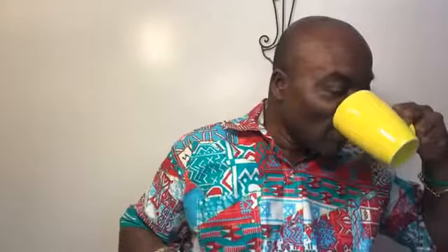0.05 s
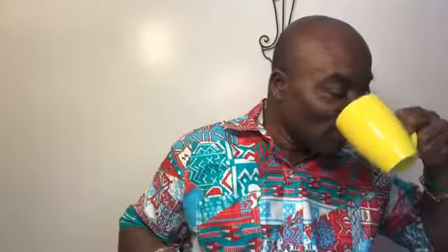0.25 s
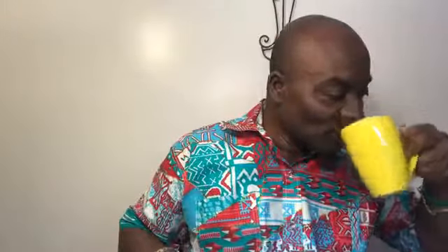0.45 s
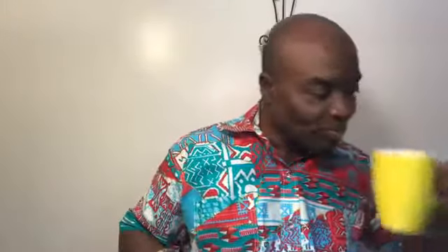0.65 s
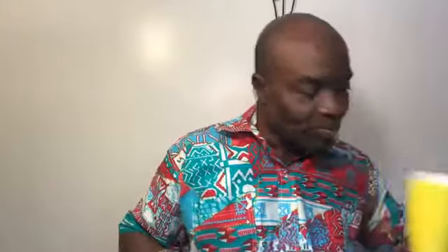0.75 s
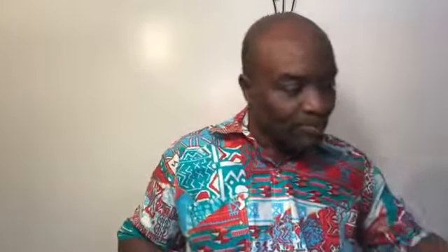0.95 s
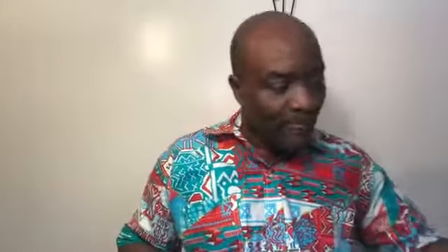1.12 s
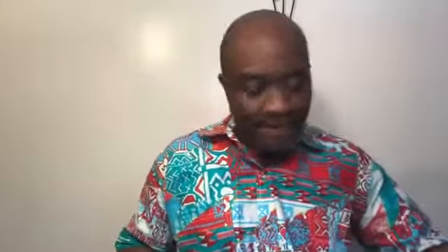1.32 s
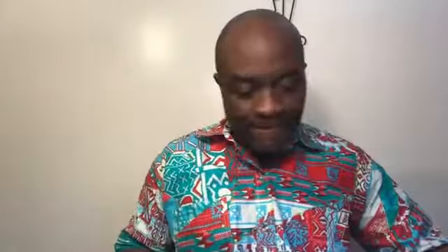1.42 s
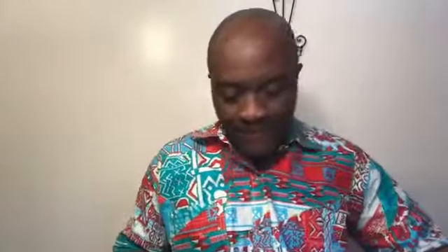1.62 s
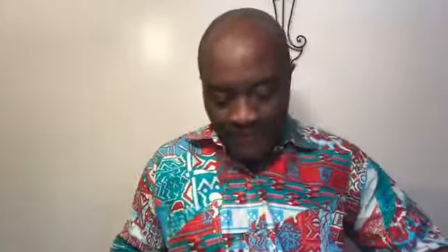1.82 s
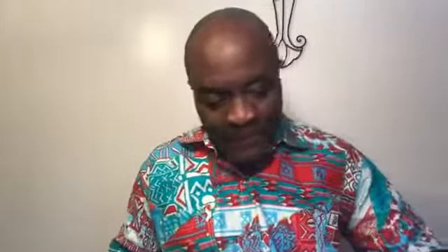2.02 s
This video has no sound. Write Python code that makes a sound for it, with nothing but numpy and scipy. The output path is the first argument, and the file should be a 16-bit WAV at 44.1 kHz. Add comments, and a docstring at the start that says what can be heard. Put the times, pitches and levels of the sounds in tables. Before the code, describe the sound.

A mug is set down on a wooden table in a small quiet room. At first there is only a faint hum and hiss, with a few very soft thuds and ticks around 0.5 and 1 second. The mug knocks on the table at about 1.5 seconds, then lands harder and brighter at about 1.9 seconds, rocking once. Each knock rings briefly and dies away.

```python
"""Small quiet room, wooden table: a mug is set down with one knock, then a harder one that rocks once more.
Each contact cracks, rings the table top and the mug, and dies away in the room.
Underneath: a few very faint thuds and ticks, mains hum, low rumble with hiss."""
import sys
import numpy as np
from scipy import signal
from scipy.fft import rfft, irfft
from scipy.io import wavfile
from scipy.ndimage import uniform_filter1d

SR = 44100
rng = np.random.default_rng(int(sys.argv[2]) if len(sys.argv) > 2 else 0)


def output_pcm(signal):
    """Save a mono or channel-first signal as 16-bit PCM at the path in sys.argv[1].

    Samples are clipped to [-1, 1] before scaling.
    """
    pcm = np.clip(np.atleast_2d(signal).T, -1, 1) * 32767
    wavfile.write(sys.argv[1], SR, np.round(pcm).astype(np.int16))


N = 91331
TIME_S = np.arange(N) / SR
FREQ_HZ = np.fft.rfftfreq(N, 1 / SR) + 1e-3

# mug foot on table: faint grazes, two knocks and their rebounds
# (time [s], gain [dB], corner [Hz], bass shelf [dB], treble bypass [dB], spot [1 if > 0.5, else 0])
CONTACTS = [(1.5005, -56.5, 2000, 6, -35, 0), (1.51, -48.5, 2000, 7, -56, 0),
            (1.5223, -5, 1836, -0.5, -55, -4.5), (1.5353, -16.5, 1100, 1.5, -48, 0),
            (1.914, -47, 2520, -1, -61.5, 1), (1.9289, -39.5, 2500, 4, -50, 1),
            (1.9390, -2.5, 2570, -8, -45, 1), (1.9650, -12, 2730, -16, -54, 1)]
# table top below about 2.3 kHz, mug above (frequency [Hz], base t60 [s])
MODES = [(168, .2), (203, .22), (272, .34), (360, .13), (517, .11), (655, .12), (701, .12), (842, .09),
         (972, .09), (1164, .1), (1256, .1), (1320, .08), (1445, .12), (1625, .065), (1667, .08),
         (1855, .05), (1980, .06), (2215, .06), (2320, .065), (2408, .11), (2565, .07), (2797, .14),
         (3250, .08), (3682, .12), (3811, .08), (4400, .08), (4700, .08), (5712, .07), (6030, .06),
         (6880, .07), (9950, .1)]
# one row per spot (drive of each mode [dB])
SPOT_DRIVE_DB = [(-15, -8.5, -17, -11, -12.5, -8.5, -21, -18.5, -10, -15.5, -10.5, -13, -7.5, -10, -14.5, -15, -4, -14, -9.5, -9.5, -22.5, -17, -7, -26, -24.5, -10.5, -6.5, -22, -6.5, -15, -4),
                 (-20, -14, -21, -7, -15, -20, -10.5, -25, -9.5, -15.5, -14, -10.5, -6, -21, -14.5, -10.5, -10.5, -20.5, -4, -3.5, -6.5, -5, -8, -15, -10, -9, -8.5, -1, 6, 2.5, -10)]
# factor on base t60 (spot 0 [ratio], spot 1 [ratio])
SPOT_T60_SCALE = (0.64, 0.95)
# table and room (band [Hz], early level [dB], early t60 [s], late level [dB], late t60 [s])
TAIL_BANDS = [(90, -41.5, .15, -32, .4), (187.2, -26, 0.13, -29, 0.36), (333.3, -28, 0.16, -35, 0.38),
              (773, -19, 0.095, -37, 0.42), (1450, -20, .12, -30.5, 0.44), (2736, -10, 0.093, -31.5, 0.48),
              (5800, -7.5, .1, -26.5, 0.54), (10500, -11, 0.12, -23.5, 0.33)]
# thuds and ticks (time [s], level [dB], pitch [Hz], t60 [s])
THUDS_TICKS = [(.085, -65.5, 870, .03), (.196, -64.5, 837, 0.039), (0.431, -48, 312, 0.062),
               (.433, -63, 820, 0.043), (0.525, -58.5, 1050, 0.036), (0.53, -66, 1975, 0.053),
               (0.526, -65.5, 5450, 0.023), (0.601, -65.5, 4510, 0.024), (.947, -45, 272, 0.025),
               (0.963, -38, 239, 0.015), (.963, -72.5, 2220, 0.11), (1.003, -61, 1430, 0.026),
               (1.027, -50.5, 307, 0.047), (1.049, -61.5, 2290, .02), (1.05, -63.5, 3290, 0.022),
               (1.065, -63, 1640, 0.024), (1.078, -46, 663, 0.017), (1.088, -49, 790, 0.011),
               (1.097, -65, 920, 0.06), (1.222, -62, 2950, 0.024), (1.775, -67.5, 5380, 0.024),
               (1.845, -59.5, 1300, 0.029)]
# mains hum (frequency [Hz], rms level [dB])
HUM_TONES = [(58.5, -72), (120, -63.5), (172, -76.5), (240, -70)]
# rumble and hiss (frequency [Hz], relative density [dB])
FLOOR_SPECTRUM = [(20, -20.5), (45, 0.5), (60, 1.5), (130, 5.5), (220, 2), (300, 1), (420, -9.5),
                  (800, -13.5), (1600, -18), (3200, -21.5), (6400, -23), (9000, -27.5), (12000, -29.5),
                  (15700, -29.5)]


def mug_knocks(contact_order=3.81, shelf_hz=619, highpass_hz=160, delay_at_1khz_s=0.0013,
               crack_hz=2000, crack_width_hz=1850, crack_gain=21.2, modes_db=-8):
    """Each contact is a push, dull above its corner, driving crack, modes and room tail."""
    crack = crack_gain / (1 + 1j * crack_hz / crack_width_hz * (FREQ_HZ / crack_hz - crack_hz / FREQ_HZ))
    modes = [undb(modes_db) * table_and_mug_modes(spot) for spot in (0, 1)]
    highpass = (1j * FREQ_HZ / (highpass_hz + 1j * FREQ_HZ)) ** 2
    spectrum = 0
    for start_s, gain_db, corner_hz, bass_db, treble_db, spot in CONTACTS:
        _, two_pole = signal.freqs(*signal.butter(2, 1, analog=True), FREQ_HZ / corner_hz)
        lowpass = two_pole ** (contact_order / 2)
        shelf = (undb(bass_db) * shelf_hz + 1j * FREQ_HZ) / (shelf_hz + 1j * FREQ_HZ)
        push = undb(gain_db) * shelf * highpass * np.exp(-2j * np.pi * FREQ_HZ * start_s)
        ringing = (lowpass + undb(treble_db)) * (modes[int(spot > .5)] + room_tail())
        spectrum += push * (lowpass * crack + ringing)
    # bending waves run faster at high pitch: each contact sweeps down
    dispersion = np.exp(-4j * np.pi * delay_at_1khz_s * np.sqrt(1000 * FREQ_HZ))
    return irfft(spectrum * dispersion, N) * (TIME_S > CONTACTS[0][0])


def table_and_mug_modes(spot):
    """Spectrum of damped sines struck at one spot; neighbours start in opposite phase."""
    ringing = 0
    for k, ((hz, t60_s), drive_db) in enumerate(zip(MODES, SPOT_DRIVE_DB[spot])):
        envelope = undb(drive_db) * decay(t60_s * SPOT_T60_SCALE[spot])
        ringing += (-1) ** k * envelope * np.sin(2 * np.pi * hz * TIME_S)
    return rfft(ringing)


def room_tail(rise_s=0.003):
    """Spectrum of the dense table and room response: noise bands decaying fast, then slower."""
    tail = 0
    for hz, early_db, early_t60_s, late_db, late_t60_s in TAIL_BANDS:
        envelope = undb(early_db) * decay(early_t60_s) + undb(late_db) * decay(late_t60_s)
        tail += octave_noise(hz) * envelope
    return rfft(tail * (1 - np.exp(-TIME_S / rise_s)))


def thuds_and_ticks(rise_s=0.001, rustle_db=-5):
    """Short damped tones, each with a rustle around its pitch."""
    out = 0
    for start_s, level_db, hz, t60_s in THUDS_TICKS:
        age_s = np.maximum(TIME_S - start_s, 0)
        envelope = undb(level_db) * decay(t60_s, age_s) * (1 - np.exp(-age_s / rise_s))
        out += envelope * (np.sin(2 * np.pi * hz * age_s) + undb(rustle_db) * octave_noise(hz))
    return out


def mains_hum(waver_db=1.5):
    """Low steady tones, wavering slightly in level."""
    out = 0
    for hz, rms_db in HUM_TONES:
        amplitude = np.sqrt(2) * undb(rms_db + waver_db * wander(rate_hz=6))
        out += amplitude * np.sin(2 * np.pi * (hz * TIME_S + rng.random()))
    return out


def room_floor(rms_db=-65.5, flicker_db=1, lowest_hz=8):
    """Rumble and hiss; each octave flickers independently."""
    white = sum(octave_noise(hz) * np.sqrt(hz) * undb(-flicker_db * wander(rate_hz=8))
                for hz in 16 * 2. ** np.arange(11))
    points_hz, points_db = np.array(FLOOR_SPECTRUM).T
    shape_db = np.interp(np.log(FREQ_HZ), np.log(points_hz), points_db)
    noise = irfft(rfft(white) * undb(shape_db) * (FREQ_HZ > lowest_hz), N)
    return noise / noise.std() * undb(rms_db)


def octave_noise(centre_hz):
    """Unit-rms noise band overlapping its octave neighbours."""
    window = np.cos(np.pi / 2 * np.clip(np.log2(FREQ_HZ / centre_hz), -1, 1))
    band = irfft(rfft(rng.standard_normal(N)) * window, N)
    return band / band.std()


def wander(rate_hz):
    """Random steps, smoothed twice."""
    hold = int(SR / rate_hz)
    steps = np.repeat(rng.standard_normal(N // hold + 1), hold)
    return 1.1 * uniform_filter1d(uniform_filter1d(steps, hold), hold)[:N]


def decay(t60_s, age_s=TIME_S):
    return np.exp(-np.log(1000) * age_s / t60_s)


def undb(db):
    return 10 ** (np.asarray(db) / 20)


def scene():
    return (mug_knocks() + thuds_and_ticks() + mains_hum() + room_floor())[None]


def record(dry, cutoff_hz=15730):
    """Steep elliptic low-pass."""
    return signal.sosfilt(signal.ellip(10, .2, 70, cutoff_hz, fs=SR, output="sos"), dry)


dry = scene()
out = record(dry)
output_pcm(out)
```